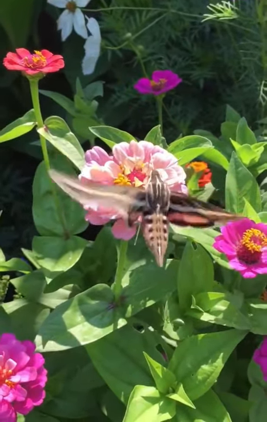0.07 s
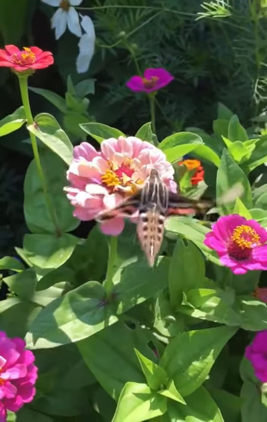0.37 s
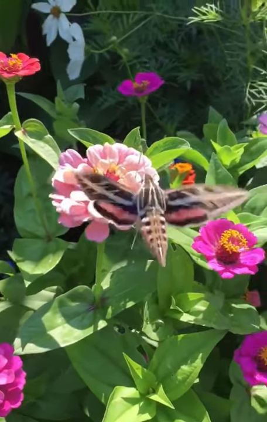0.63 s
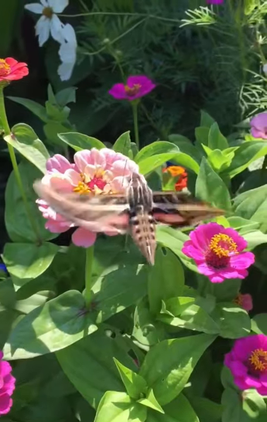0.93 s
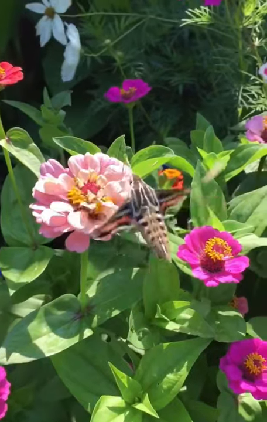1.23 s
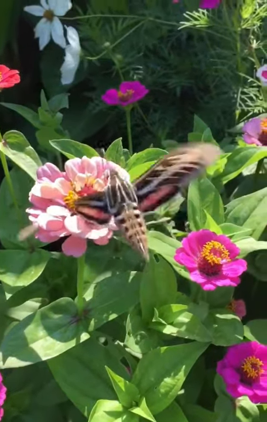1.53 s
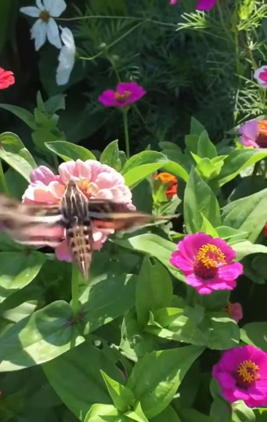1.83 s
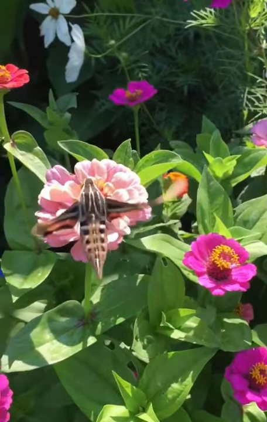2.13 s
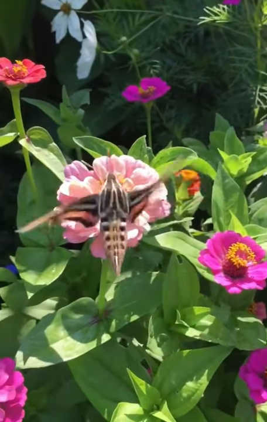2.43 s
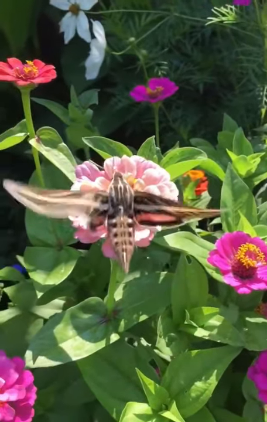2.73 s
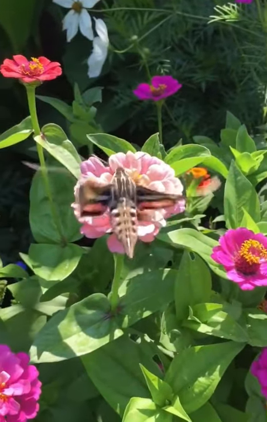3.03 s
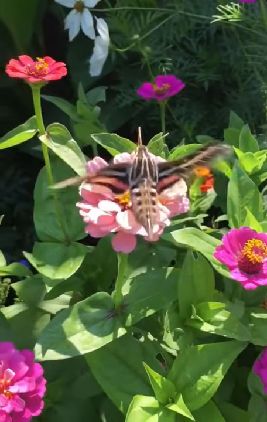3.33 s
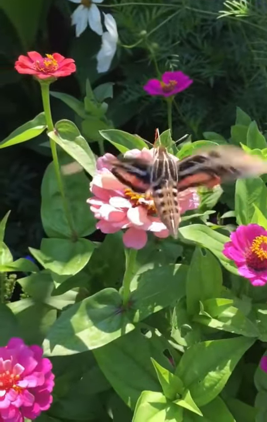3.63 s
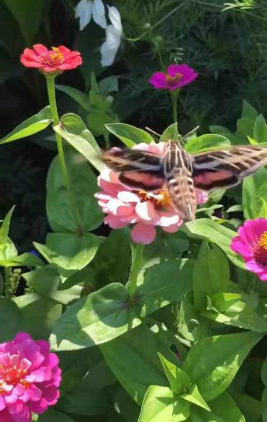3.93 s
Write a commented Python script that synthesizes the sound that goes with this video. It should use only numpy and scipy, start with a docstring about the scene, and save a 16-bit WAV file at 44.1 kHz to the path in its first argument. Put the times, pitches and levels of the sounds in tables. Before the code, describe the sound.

A hawk moth's wings purr close to the microphone for the whole four seconds, a quiet low hum that throbs unevenly. A distant engine drone, light wind rumble and steady hiss blend with it. From about 1.5 to 2 seconds a small bird gives one faint, thin, high whistle. From around 2.5 seconds, faint road noise swells and brightens with brief whines, staying beneath the purr.

```python
"""Hawk moth at a garden flower

A hawk moth hovers close to the microphone, its wings purring at about 40 beats a second.
A distant engine drones, light wind rumbles on the microphone, and the low hum throbs unevenly.
A small bird gives one thin, high whistle over a steady hiss, and road noise swells in the second half."""
import sys
import numpy as np
from scipy import signal
from scipy.fft import rfft, irfft, next_fast_len
from scipy.io import wavfile
from scipy.ndimage import uniform_filter1d, map_coordinates

SR = 44100
rng = np.random.default_rng(int(sys.argv[2]) if len(sys.argv) > 2 else 0)


def to_wav(sig):
    """Store sig (one row per channel, or 1-D mono) as 16-bit WAV at the path in sys.argv[1].

    Samples outside -1..1 are clipped; the rate is SR.
    """
    pcm = np.clip(np.atleast_2d(sig), -1, 1) * 32767
    pcm = np.round(pcm).astype(np.int16)
    wavfile.write(sys.argv[1], SR, pcm.T)  # frames by channels


N = 176400


def amp(db):
    """Decibels to gain."""
    return 10 ** (np.asarray(db) / 20)


def unit(x):
    """Scale to rms 1."""
    return x / np.sqrt(np.mean(x ** 2) + 1e-20)


def curves(rows):
    """One value per sample for each column after the time."""
    times, *columns = np.transpose(rows)
    return [np.interp(np.arange(N) / SR, times, column) for column in columns]


def wobble(rate):
    """A smooth random curve, rate knots a second."""
    knots = rng.standard_normal(int(N * rate / SR) + 4)
    return map_coordinates(knots, [np.arange(N) * rate / SR])


def swell(peak_s, half_width):
    """A bell-shaped rise and fall; half_width is its standard deviation in seconds."""
    return np.exp(-.5 * ((np.arange(N) / SR - peak_s) / half_width) ** 2)


def filtered(x, response):
    """Equalise x with a gain that is a function of frequency."""
    size = next_fast_len(N + SR // 2)
    return irfft(rfft(x, size) * response(np.fft.rfftfreq(size, 1 / SR)), size)[:N]


def noise(spectrum, patchy_db):
    """Coloured noise of rms 1 with patches of random gain across time and frequency."""
    bins = signal.stft(rng.standard_normal(N), nperseg=1024)[2]
    patches = uniform_filter1d(rng.standard_normal(bins.shape), size=3, axis=0)
    patches = uniform_filter1d(patches, size=6, axis=1)
    white = signal.istft(bins * amp(patchy_db * unit(patches)), nperseg=1024)[1][:N]
    freqs, db = np.transpose(spectrum)
    return unit(filtered(white, lambda hz: amp(np.interp(np.log(hz + 1), np.log(freqs), db))))


def drone(control, partials, waver_db, waver_rate, jitter_rad):
    """Soft pulses on one rate curve, uneven in strength and timing."""
    hz, db = curves(control)
    phase = 2 * np.pi * np.cumsum(hz) / SR + rng.uniform(0, 4 * np.pi)
    phase += jitter_rad * wobble(waver_rate)
    pulses = sum(amp(level) * np.cos(multiple * phase) for multiple, level in partials)
    return -np.sqrt(2) * amp(db + waver_db * wobble(waver_rate)) * pulses


# The purr of the wings. Each row: time in seconds, beats per second, level in dB.
WINGBEAT = [(0, 41.2, -52.5), (.3, 42.2, -51), (.65, 38.3, -57), (1.1, 41.4, -52), (1.5, 39.1, -59),
            (2, 38.6, -56.5), (2.6, 38.6, -62), (3, 38.8, -57), (3.4, 37.5, -56), (3.75, 41.5, -58.5),
            (4, 33.3, -66)]
# The tone of the purr. Each row: multiple of the wingbeat, relative level in dB.
WING_PARTIALS = [(1, -16.5), (2, 0.5), (3, -5.5), (4, -21), (5, -22)]
# Throbs in the low hum: brief, louder low swells.
# Each row: peak time and half-width in seconds, pitch in Hz, peak level in dB.
HUM_THROBS = [(0.057, 0.0106, 80, -42.9), (0.198, 0.0154, 73.4, -45.5), (0.246, 0.014, 81.0, -40.5),
              (0.297, 0.01, 83, -42), (0.366, 0.0096, 84.0, -39.5), (0.492, 0.012, 76.4, -40),
              (0.682, 0.008, 82.0, -41), (0.723, 0.0076, 70.4, -39.5), (0.8, 0.0067, 71.5, -42),
              (0.859, 0.01, 81, -40.5), (0.992, 0.014, 89, -42.5), (1.047, 0.013, 77, -41),
              (1.17, 0.0077, 75, -39.2), (1.331, 0.013, 70, -39.5), (1.42, 0.008, 85, -41),
              (1.546, 0.0072, 77.6, -43), (1.624, 0.0093, 66.0, -36.7), (1.673, 0.0063, 85, -40.5),
              (1.8, 0.0077, 81.0, -41.7), (1.895, 0.018, 76, -46.5), (1.953, 0.0062, 81.4, -38),
              (2.082, 0.006, 82, -38.2), (2.111, 0.0081, 85, -41.5), (2.166, 0.009, 75.0, -38.5),
              (2.207, 0.0073, 84, -41.5), (2.33, 0.013, 74.57, -43.5), (2.4, 0.0073, 83, -39.5),
              (2.474, 0.011, 85.27, -38), (2.604, 0.013, 76.5, -44.5), (2.729, 0.0049, 84.0, -44.5),
              (2.858, 0.012, 70.0, -45), (3.099, 0.0082, 90.83, -37), (3.124, 0.0055, 90, -34.5),
              (3.203, 0.0065, 74.96, -39.5), (3.252, 0.0082, 80.4, -42), (3.435, 0.0096, 71.07, -41),
              (3.592, 0.0071, 77.0, -44.5), (3.664, 0.0041, 72.0, -40), (3.705, 0.016, 73.3, -42.5),
              (3.767, 0.0055, 87.0, -39), (3.845, 0.0103, 68, -37), (3.949, 0.0098, 80.8, -39.9)]


def moth():
    """Upstroke and downstroke each push the air, so twice the wingbeat is strongest."""
    purr = drone(WINGBEAT, WING_PARTIALS, waver_db=1.0, waver_rate=33, jitter_rad=0.16)
    t = np.arange(N) / SR
    octave_db = -28.5
    for peak_s, half_width, hz, db in HUM_THROBS:
        phase = 2 * np.pi * hz * (t - peak_s)
        throb = -amp(db) * (np.cos(phase) + amp(octave_db) * np.cos(2 * phase))
        # Crossfade briefly to a louder low tone and back.
        purr += swell(peak_s, half_width) * (throb - purr)
    return purr


# The engine's drone. Each row: time in seconds, firing rate in Hz, level in dB.
ENGINE_FIRING = [(0, 64.35, -60), (.6, 64.6, -53.5), (1, 65.57, -57.5), (1.65, 62.99, -56),
                 (2.15, 66.5, -57.5), (2.3, 67.68, -58.5), (2.48, 68.9, -55.5), (2.9, 62.2, -57),
                 (3.1, 66.05, -58), (3.35, 64.13, -57), (3.7, 67.5, -57.5), (4, 67, -52)]
# The tone of the engine. Each row: multiple of the firing rate, relative level in dB.
ENGINE_ORDERS = [(1, 3.5), (1.5, -7.5), (2, -21.5), (3, -24)]


def engine():
    """The firing pulses of a far engine blend into a wavering drone."""
    return drone(ENGINE_FIRING, ENGINE_ORDERS, waver_db=0.8, waver_rate=14, jitter_rad=0.1)


# The rise and fall of the wind. Each row: time in seconds, level in dB.
WIND_LEVEL = [(0, -52), (.7, -61), (1.4, -54.5), (1.8, -56.5), (2.4, -54), (2.85, -55), (3.12, -54),
              (3.35, -56), (4, -52.5)]
# The wind's deep colour. Each row: frequency in Hz, relative level in dB.
WIND_SPECTRUM = [(15, -28), (30, -7), (50, -2), (70, -3), (105, 0), (140, -11.5), (200, -21), (300, -30),
                 (600, -47), (2000, -80)]


def wind():
    """Light wind on the microphone makes a low, uneven rumble."""
    level_db, = curves(WIND_LEVEL)
    return amp(level_db + 1.7 * wobble(rate=13)) * noise(WIND_SPECTRUM, patchy_db=1.5)


# The colour of the hiss. Each row: frequency in Hz, relative level in dB.
HISS_SPECTRUM = [(150, -24.5), (250, -2.5), (500, -6.5), (640, -2.5), (740, -6), (950, -3.5), (1100, -6),
                 (1550, -9), (1760, -8.5), (2500, -12.5), (4500, -16.5), (4930, -21), (5250, -17.5),
                 (7060, -19), (7560, -21.5), (9130, -21.5), (9950, -24.5), (10300, -27), (10900, -24.5),
                 (12300, -24.5), (15000, -27.8)]


def hiss(level_db=-69.5):
    """A steady bed of garden air and microphone hiss."""
    return amp(level_db) * noise(HISS_SPECTRUM, patchy_db=2.0)


# Dips in the low hum. Each row: time of the deepest point in seconds, half-width in seconds.
HUM_DIPS = [(.09, 0.014), (0.16, 0.014), (0.334, 0.007), (0.386, .007), (0.462, 0.012), (0.763, 0.0092),
            (0.897, 0.0081), (0.956, 0.0084), (1.124, 0.0088), (1.204, 0.0069), (1.37, .01), (1.446, .013),
            (1.587, .009), (1.992, 0.0047), (2.268, 0.016), (2.965, 0.014), (3.044, 0.01), (3.226, 0.0094),
            (3.747, 0.008), (3.812, 0.012)]


def lulls(depth_db=-8):
    """A gain curve that dips briefly between throbs."""
    return amp(depth_db * sum(swell(time, half_width) for time, half_width in HUM_DIPS))


# Breathy whooshes of stirred air. Each row: peak time and half-width in seconds, level in dB.
AIR_SWELLS = [(0.717, 0.019, -60), (0.938, 0.037, -60.5), (1.427, .015, -59.5), (1.78, 0.031, -64.5),
              (2.1, .035, -63.5), (2.448, 0.029, -61.5), (3.124, .022, -55.5), (3.502, 0.013, -56.5),
              (3.926, 0.05, -60.5)]
# Their dark colour. Each row: frequency in Hz, relative level in dB.
WHOOSH_SPECTRUM = [(60, -16), (130, 4.5), (190, -5.5), (250, -15), (450, -37.5), (1500, -73)]


def whooshes():
    """Short swells of turbulent air at the microphone."""
    envelope = sum(amp(db) * swell(peak_s, half_width) for peak_s, half_width, db in AIR_SWELLS)
    return envelope * noise(WHOOSH_SPECTRUM, patchy_db=1.5)


# The bird's one note. Each row: time in seconds, pitch in Hz, level in dB.
BIRD_NOTE = [(1.48, 7270, -110), (1.56, 7240, -85), (1.61, 7255, -80), (1.635, 7245, -94),
             (1.75, 7205, -89), (1.85, 7140, -84), (1.89, 7110, -91), (1.94, 7050, -89), (2.03, 7000, -110)]


def bird():
    """One thin falling whistle, slightly unsteady."""
    hz, db = curves(BIRD_NOTE)
    t = np.arange(N) / SR
    sounding = (t > BIRD_NOTE[0][0]) & (t < BIRD_NOTE[-1][0])
    phase = 2 * np.pi * np.cumsum(hz + 18 * wobble(rate=120)) / SR
    return np.sqrt(2) * amp(db) * sounding * np.sin(phase)


# The swell of the road. Each row: time in seconds, level of the body in dB, level of the treble in dB.
ROAD_LEVELS = [(0, -91.5, -100), (1.8, -89.5, -100), (2.5, -75, -94), (2.9, -74, -94), (3.25, -74, -80.5),
               (3.5, -74.5, -84), (4, -75, -78)]
# The colours of its body and its treble. Each row: frequency in Hz, relative level in dB.
ROAD_BODY_SPECTRUM = [(150, -25), (480, -10), (670, 6), (790, -3), (950, -5), (1400, -3), (1850, -4.5),
                      (2500, -19), (5000, -28), (10000, -55)]
ROAD_TREBLE_SPECTRUM = [(600, -20), (1300, -10.5), (2000, 0), (2700, -3), (4000, -14), (7000, -23),
                        (12000, -34)]
# Brief whines. Each row: peak time and half-width in seconds, pitch and its spread in Hz, level in dB.
ROAD_WHINES = [(2.5, 0.19, 675, 60, -80), (2.565, 0.022, 920, 35, -73), (2.74, .035, 684, 65, -78.5),
               (2.74, .03, 950, 45, -77), (3.05, 0.024, 1460, 25, -75), (3.213, .024, 1455, 25, -74.5),
               (3.18, .045, 675, 60, -76.5), (3.21, .05, 2040, 150, -77.5), (3.25, 0.077, 2600, 300, -81),
               (3.15, .2, 1760, 45, -83), (3.6, 0.04, 1777, 30, -77), (3.69, 0.032, 665, 35, -73)]


def traffic():
    """Road noise that swells and brightens, with brief whines that wander in pitch."""
    body_db, treble_db = curves(ROAD_LEVELS)
    road = amp(body_db) * noise(ROAD_BODY_SPECTRUM, patchy_db=1.5)
    road += amp(treble_db) * noise(ROAD_TREBLE_SPECTRUM, patchy_db=5.5)
    for peak_s, half_width, pitch, spread, db in ROAD_WHINES:
        hz = pitch + .5 * spread * wobble(rate=2 * spread)
        whine = np.sqrt(2) * np.sin(2 * np.pi * np.cumsum(hz) / SR)
        road += amp(db) * swell(peak_s, half_width) * whine
    return road


def scene():
    """All sources at one microphone; moth, engine and wind dip together in the lulls."""
    low_hum = moth() + engine() + wind()
    mix = lulls() * low_hum + whooshes() + traffic() + bird() + hiss()
    return mix[None]


def record(dry):
    """The camera keeps nothing above its band limit."""
    top_hz = 15250
    return np.array([filtered(channel, lambda hz: hz < top_hz) for channel in dry])


dry = scene()
out = record(dry)
to_wav(out)
```